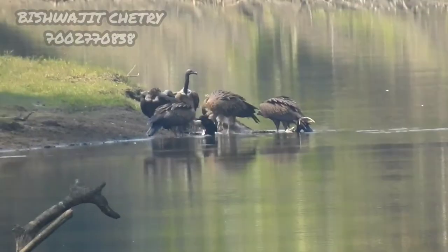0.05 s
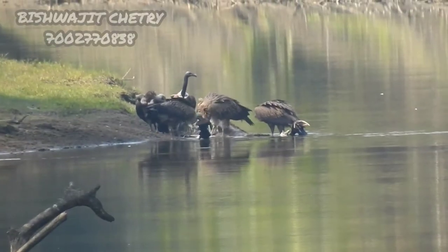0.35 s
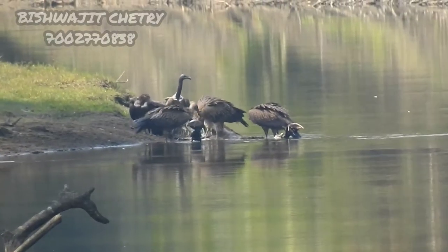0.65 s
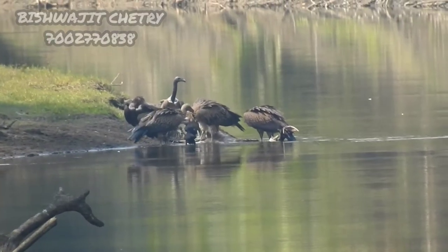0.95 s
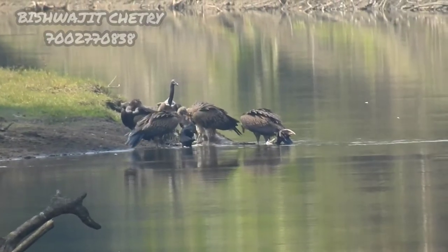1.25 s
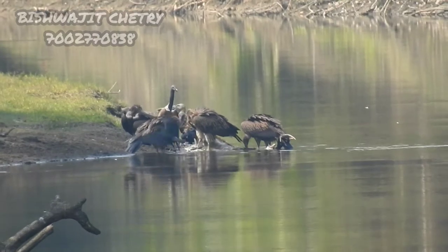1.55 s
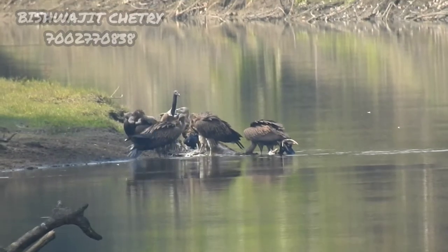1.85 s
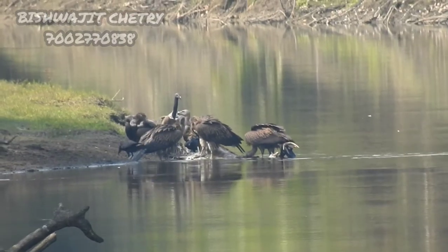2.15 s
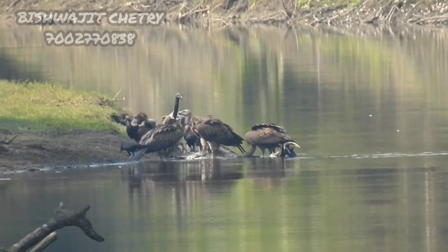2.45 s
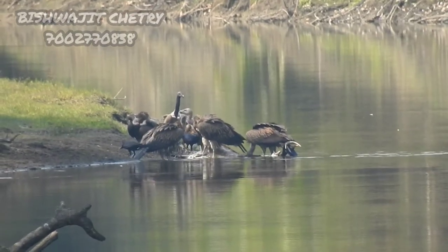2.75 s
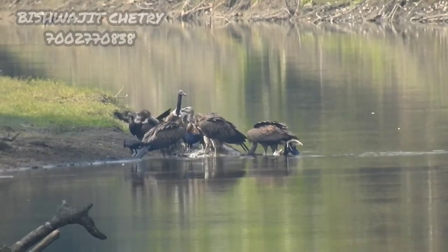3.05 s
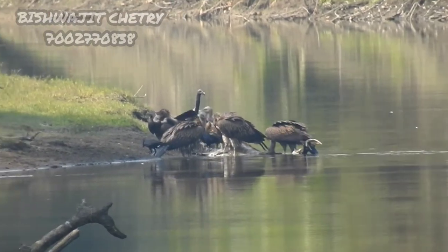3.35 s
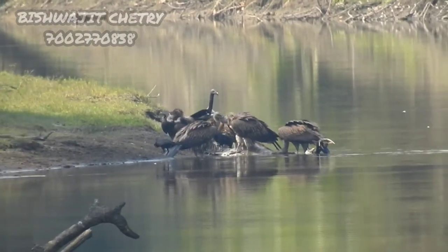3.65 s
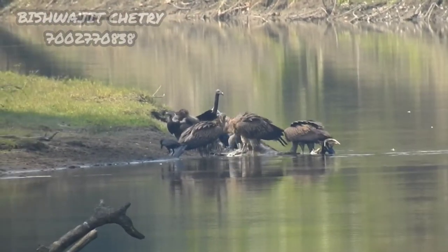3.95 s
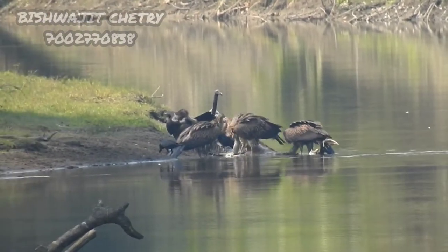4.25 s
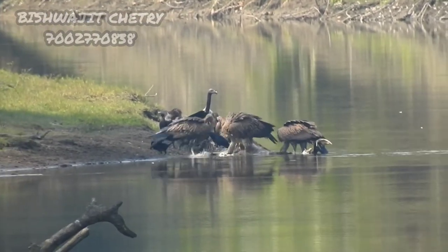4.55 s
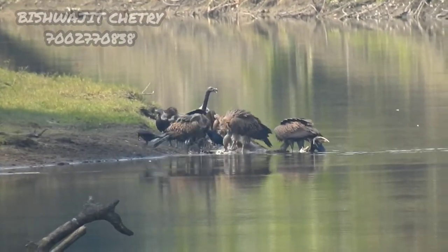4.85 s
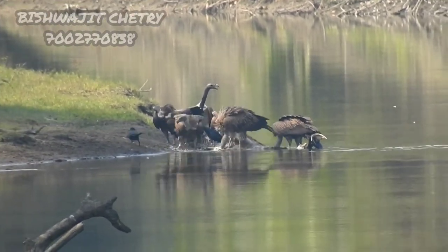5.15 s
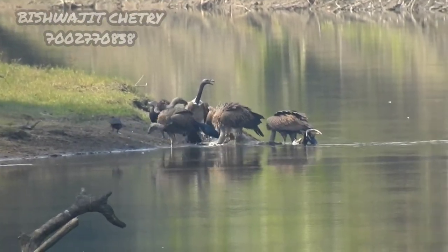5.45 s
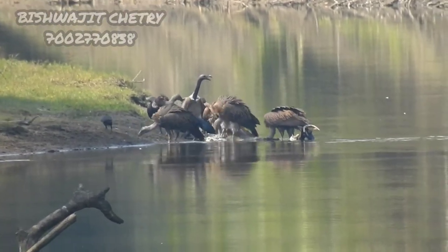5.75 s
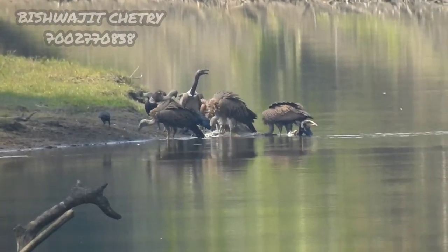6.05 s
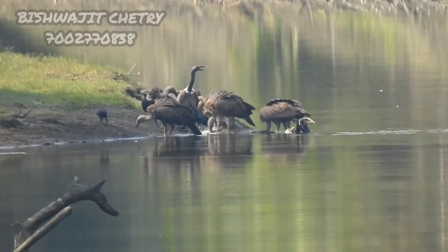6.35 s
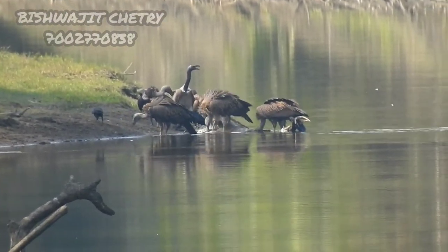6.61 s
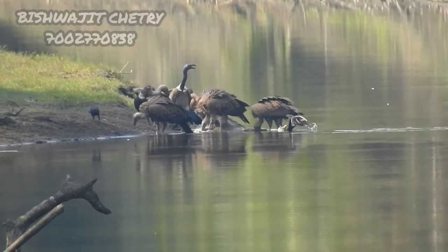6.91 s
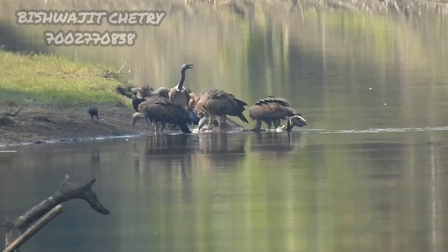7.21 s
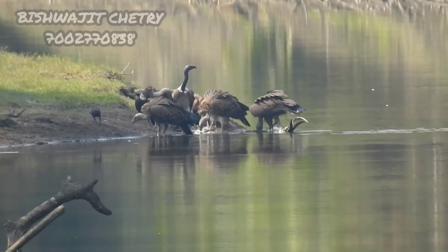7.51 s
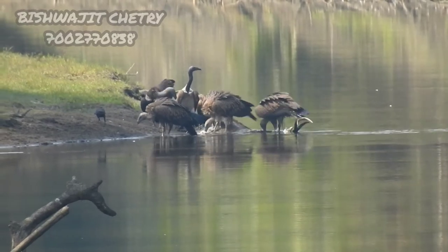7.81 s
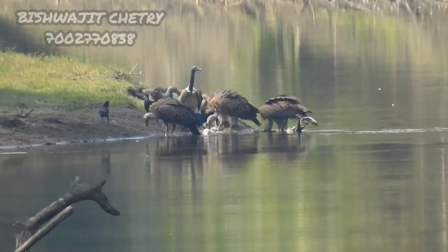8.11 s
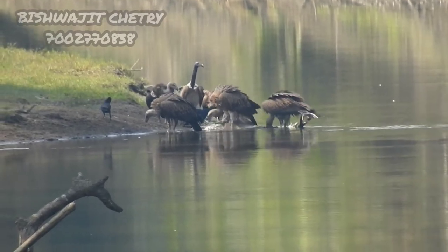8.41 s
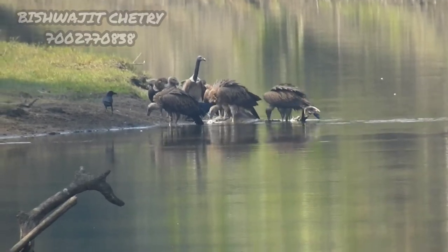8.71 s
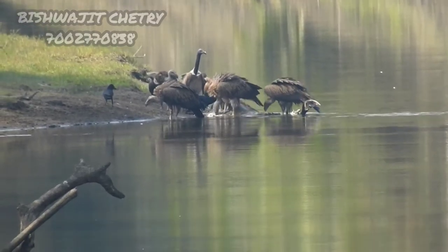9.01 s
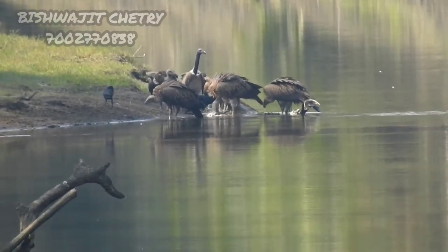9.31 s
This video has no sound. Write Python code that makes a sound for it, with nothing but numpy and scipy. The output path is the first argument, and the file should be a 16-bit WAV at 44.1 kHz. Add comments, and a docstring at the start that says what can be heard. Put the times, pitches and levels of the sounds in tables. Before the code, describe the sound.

Many small birds call over each other on a wooded river bank, with thin buzzy calls, mellow warbles and quick chips, each blurred by a short echo. Faint hoots and hoarse caws come from far off. About halfway, one sharp tick snaps close to the stereo microphones, followed by a few rising whistles and later a quick twitter. Distant chatter, thin hiss and a low drone lie behind throughout.

```python
"""A wooded river bank, heard through a stereo pair of microphones. Small birds call over each other,
each note a gliding, wavering tone from the syrinx: thin high calls, mellow warbles, twitters, chips,
rising whistles and far hoots and caws. The trees scatter every note into a short wash.
One sharp tick sounds close by, one dull knock further off. Behind it all lie a far chorus,
a thin hiss, a low steady drone and a fading rumble."""
import sys
import numpy as np
from scipy import signal
from scipy.fft import rfft, irfft, next_fast_len
from scipy.io import wavfile
from scipy.ndimage import uniform_filter1d

SR = 44100
rng = np.random.default_rng(int(sys.argv[2]) if len(sys.argv) > 2 else 0)


def materialize(psi):
    """Save the field psi as 16-bit PCM at rate SR to the path in sys.argv[1].

    A 1-D psi becomes a single channel; in a 2-D psi each row is a channel.
    """
    bounded = np.clip(np.atleast_2d(psi).T, -1, 1)
    quanta = np.round(bounded * 32767).astype(np.int16)
    wavfile.write(sys.argv[1], SR, quanta)


N = 422037
TIME = np.arange(N) / SR
SIDES = np.array([[.5], [-.5]])  # left and right microphone

# three-part calls: upstroke_start_s, upstroke_length_s, fall_lead_s, fall_db, upstroke_db, top_db
THIN_CALLS = [(0.745, 0.075, 0.068, -32.5, -31, -30), (3.596, 0.047, 0.069, -40.5, -37, -39.5),
              (4.979, 0.03, 0.099, -37, -31, -30.5), (7.964, 0.042, .092, -33.5, -32.5, -33.5),
              (9.055, 0.022, 0.081, -38, -29.5, -30)]
# lone high notes: start_s, length_s, pitch_hz, level_db, syllable
THIN_NOTES = [(1.72, 0.024, 6620, -34, "fall"), (2.385, 0.062, 6230, -42, "arch"),
              (2.803, 0.024, 6200, -36, "dive"), (3.26, 0.026, 7550, -45, "sag"),
              (5.565, 0.031, 7460, -45, "flat"), (8.795, 0.022, 7300, -42, "flat")]
def thin_calls(fall_hz=(6800, 5600, 5000), rise_hz=(5300, 6250, 8200), top_hz=(6300, 6680, 7000)):
    """High, buzzy calls: a soft fall, a pause, then an upstroke that runs into a top note."""
    notes = spell(THIN_NOTES)
    for start, length, lead, fall_db, rise_db, top_db in THIN_CALLS:
        notes += [(start - lead, 0.04, *fall_hz, fall_db),
                  (start, length, *rise_hz, rise_db),
                  (start + 0.62 * length, 0.046, *top_hz, top_db)]
    voice = sing(notes, waver=0.0176, buzz=0.039, edge=0.32, rough_db=-1.5)
    return place(voice, pan_db=-0.5, lag_ms=0.045, direct_db=-9.5, wet_db=-1.5, t60_s=0.65)


# mellow notes: start_s, length_s, pitch_hz, level_db, syllable
WARBLES = [(.205, 0.034, 2450, -40.5, "rise"), (.431, 0.025, 3535, -31.5, "sag"),
           (.455, 0.018, 3205, -29, "flat"), (.53, 0.056, 2336, -42, "sag"),
           (.635, 0.067, 2810, -37.5, "sag"), (.70, 0.031, 2210, -40.5, "sag"),
           (1.64, 0.06, 3376, -41.5, "arch"), (2.125, 0.063, 3300, -47, "arch"),
           (2.197, 0.041, 2850, -48, "fall"), (4.96, 0.034, 3380, -36, "flat"),
           (7.94, 0.043, 3700, -37.5, "sag"), (8.44, 0.031, 3610, -40, "sag"),
           (8.8, 0.045, 2760, -45, "lift"), (9.41, 0.17, 2918, -44.5, "flat")]
def warbles():
    """Mellow single notes, with a wash that builds slowly among the trunks."""
    voice = sing(spell(WARBLES), waver=0.014, edge=0.14, rough_db=3.5)
    return place(voice, pan_db=-2, lag_ms=-0.028, direct_db=-4, wet_db=-4.5, t60_s=1, build_s=0.02)


# a rising series: start_s, length_s, pitch_hz, glide_hz
WHISTLES = [(5.585, 0.015, 3590, 100), (5.7, 0.07, 3720, -30), (5.851, 0.055, 3864, 382),
            (5.986, 0.05, 4265, 190), (6.024, 0.036, 4412, 50)]
# echoes from the banks: delay_s, level_db
BANK_ECHOES = [(.024, -8), (0.048, -9), (.074, -13)]
def whistles(top_db=-27, db_per_octave=52):
    """Pure, straight glides, each higher and so louder than the last, thrown back by the banks."""
    top_hz = max(hz for _, _, hz, _ in WHISTLES)
    notes = []
    for start, length, hz, glide in WHISTLES:
        db = top_db + db_per_octave * np.log2(hz / top_hz)
        notes.append((start, length, hz - glide / 2, hz, hz + glide / 2, db))
    voice = sing(notes, edge=0.35)
    echoed = voice.copy()
    for delay, db in BANK_ECHOES:
        add(echoed, delay, undb(db) * voice)
    return place(echoed, lag_ms=.025, direct_db=0, wet_db=-7.5, t60_s=0.97, spread=0.83)


# four slurs: delay_s, length_s, pitch_hz, level_db, syllable
SONG = [(0, .043, 3400, -37.5, "fall"), (0.193, .038, 2810, -39.5, "fall"), (0.254, .05, 2400, -44, "sag"),
        (.342, 0.061, 2495, -43, "fall")]
# each time it is sung: start_s, gain_db
SONG_ENTRIES = [(4.898, 0), (9.02, -0.5)]
def songs():
    """A short warbled song that steps downward, from right of the microphones."""
    rows = [(start + delay, length, hz, db + gain_db, syllable)
            for start, gain_db in SONG_ENTRIES for delay, length, hz, db, syllable in SONG]
    voice = sing(spell(rows), waver=0.018, edge=0.21, rough_db=1)
    return place(voice, pan_db=-3.5, direct_db=-3.5, wet_db=-1, t60_s=0.92, build_s=0.026)


# three quick notes: start_s, length_s, pitch_hz, syllable
TWITTER = [(8.634, 0.047, 5560, "rise"), (8.678, 0.025, 4880, "hook"), (8.716, .03, 5730, "rise")]
def twitter(db=-35):
    """A loud up-down-up twitter from a perch to the right."""
    rows = [(start, length, hz, db, syllable) for start, length, hz, syllable in TWITTER]
    voice = sing(spell(rows), waver=0.014, edge=0.2, rough_db=2)
    return place(voice, pan_db=-4.5, lag_ms=0.046, wet_db=0.5, t60_s=0.68)


# short chips: start_s, length_s, level_db
CHIPS = [(1.668, .0067, -41), (7.872, 0.01, -45), (8.507, 0.0098, -35.5), (8.519, 0.0066, -33.5),
         (8.636, 0.017, -40.5)]
def chips(sweep_hz=(5500, 6800, 7660)):
    """Each chip is the same very fast upward sweep."""
    notes = [(start, length, *sweep_hz, db) for start, length, db in CHIPS]
    return place(sing(notes, waver=0.043), lag_ms=0.041, wet_db=-1.5, t60_s=0.71)


def tick(start_s=5.04534, hz=7000, upper_hz=9800, rise_ms=0.41, db=-9, echo_ms=0.93):
    """One thin snap near the microphones: a few cycles of two resonances and a quick reflection."""
    t = TIME[:SR // 100]
    age = 1000 * t / rise_ms
    envelope = (age * np.exp(1 - age)) ** 4
    ring = envelope * (np.sin(2 * np.pi * hz * t) + undb(-19) * np.sin(2 * np.pi * upper_hz * t))
    track = np.zeros(N)
    add(track, start_s, undb(db) * ring)
    add(track, start_s + echo_ms / 1000, undb(db - 13) * ring)
    return place(track, lag_ms=.012, direct_db=1.5, wet_db=-10, t60_s=0.085)


# slurred notes: start_s, length_s, pitch_hz, level_db, syllable
SLURS = [(0.418, 0.13, 4610, -50.5, "arch"), (1.048, 0.045, 5200, -47, "lift"),
         (2.105, 0.081, 5390, -49, "bow"), (2.45, 0.071, 4700, -48.5, "arch"),
         (2.465, 0.11, 6650, -46.5, "sag"), (2.545, 0.058, 3870, -48, "hook"),
         (3.036, 0.0315, 4250, -43, "ease"), (3.865, 0.076, 2810, -49.5, "flat"),
         (4.641, 0.11, 2950, -50.5, "rise"), (5.368, 0.034, 5370, -52, "fall"),
         (5.874, 0.038, 5200, -41.5, "dip"), (6.3, 0.11, 4770, -53.5, "arch"),
         (6.445, 0.031, 3840, -44.5, "dive"), (6.591, 0.035, 3000, -48, "fall"),
         (6.805, 0.049, 5100, -49, "fall"), (9.53, 0.038, 4100, -48, "fall")]
def slurs():
    """Single gliding notes from further along the bank."""
    voice = sing(spell(SLURS), waver=0.018, edge=0.074)
    return place(voice, pan_db=-3, direct_db=0, wet_db=0.5, t60_s=1, build_s=0.003)


# raspy notes: start_s, length_s, pitch_hz, level_db, syllable
FAR_TWITTERS = [(0, 0.044, 5200, -44, "rise"), (.13, .05, 4300, -48, "fall"),
                (1.29, .04, 4390, -43.5, "fall"), (1.56, 0.031, 2133, -44.5, "hook"),
                (1.59, .075, 5430, -43, "rise"), (2.0, 0.045, 3560, -43.5, "arch"),
                (2.85, 0.049, 5280, -44.5, "sag"), (3.125, .05, 2380, -47.5, "fall"),
                (3.28, 0.041, 2205, -43.5, "sag"), (3.675, 0.048, 3680, -43, "hook"),
                (3.7, 0.045, 2510, -47, "fall"), (4.0, 0.054, 2570, -47.5, "fall"),
                (4.83, .033, 5300, -40, "sag"), (6.06, .16, 5740, -53.5, "lift"),
                (6.94, 0.034, 4650, -45, "dive"), (7.34, .09, 3230, -63, "fall"),
                (8.24, 0.2, 4520, -50.5, "lift"), (8.885, 0.021, 3900, -49, "dive"),
                (9.415, .055, 4450, -45.5, "sag")]
def far_twitters():
    """Birds deep in the trees, reaching the microphones almost only as wash."""
    voice = sing(spell(FAR_TWITTERS), waver=0.045, edge=0.16, rough_db=5)
    return place(voice, pan_db=-3.5, direct_db=-8, wet_db=1.5, t60_s=0.77, build_s=0.0029)


# low notes: start_s, length_s, pitch_hz, level_db, syllable
HOOTS = [(2.872, 0.094, 916, -49, "ease"), (2.985, 0.043, 892, -48, "flat"),
         (3.79, 0.05, 935, -51.5, "sag"), (3.87, 0.098, 880, -52.5, "flat"),
         (5.225, 0.074, 952, -50.5, "sag"), (5.3, 0.083, 887, -52, "flat"),
         (5.752, 0.054, 844, -52.5, "ease"), (6.975, 0.091, 1027, -52.5, "rise")]
def hoots():
    """Soft hoots from far across the water."""
    voice = sing(spell(HOOTS), waver=0.015, edge=0.099)
    return place(voice, direct_db=1, wet_db=-4, t60_s=0.93, spread=0.36, build_s=0.018)


# distant caws: start_s, length_s, pitch_hz, level_db
CAWS = [(0.534, 0.39, 1357, -54), (1.058, 0.22, 1343, -50), (5.946, 0.34, 1486, -53),
        (6.397, 0.43, 1315, -55), (8.551, 0.21, 1285, -51)]
def caws():
    """Held notes, made hoarse by a fast waver in pitch and level."""
    notes = [(start, length, hz, hz, hz, db) for start, length, hz, db in CAWS]
    return place(sing(notes, waver=0.06, waver_hz=280, rough_db=3), spread=0.16)


def knock(start_s=2.3, hz=700, decay_s=0.014, db=-46):
    """One faint, dull knock some way off: a band of noise that dies quickly."""
    band = signal.butter(2, [hz / 2, hz * 2], "band", fs=SR, output="sos")
    body = unit(signal.sosfilt(band, rng.standard_normal(SR // 10)))
    track = np.zeros(N)
    add(track, start_s, undb(db) * body * np.exp(-TIME[:len(body)] / decay_s))
    return place(track)


# swell of the chorus: time_s, level_db
CHORUS_LEVEL = [(0, -59.5), (1, -63), (3.4, -64.5), (4.8, -57), (5.6, -63), (7.6, -62.5), (9.57, -60)]
# its colour at the microphones: frequency_hz, gain_db
CHORUS_COLOUR = [(2200, -2.5), (2800, 2.5), (3950, -2), (4500, -2), (5200, -6.5), (6000, 3)]
def chorus(count=800, low_hz=2150, high_hz=5650, scatter_db=3, bend=0.0799, length_s=.045):
    """Many far birds: short raspy slurs, blurred by the trees into a faint chatter."""
    timing, height, stretch = rng.random((count, 3)).T
    first, last, loudness = rng.standard_normal((count, 3)).T
    hz = low_hz * (high_hz / low_hz) ** height
    starts = (np.arange(count) + timing) / count * N / SR
    db = np.interp(starts, *np.transpose(CHORUS_LEVEL)) + scatter_db * loudness
    notes = zip(starts, length_s * (.5 + stretch), hz * (1 + bend * first), hz, hz * (1 + bend * last), db)
    chatter = shape(sing(notes, waver=0.02425, rough_db=3), CHORUS_COLOUR)
    return place(chatter, pan_db=-3, direct_db=-2.5, wet_db=4.5, t60_s=0.26)


# still air between the calls: frequency_hz, density_db
AIR_SPECTRUM = [(180, -42), (300, -5.5), (590, -2.5), (1000, 0), (1730, 0.5), (2250, -3), (3280, -0.5),
                (4210, -0.5), (6250, -5), (7880, -19), (15500, -35)]
# a narrow dip and peak in it: frequency_hz, gain_db
AIR_COLOUR = [(3600, 0), (3950, -6), (4200, 0), (5400, -0.5), (6200, 3), (7000, 1)]
# midrange level of the hiss: time_s, gain_db
MIDRANGE_GAIN = [(0, -4), (.25, -7), (.6, -2), (1.55, -0.5), (1.88, -4.5), (2.15, -4), (2.97, -3.5),
                 (3.2, -2), (5.9, -1), (7.7, -3), (7.9, -4), (8.15, -0.5), (9.57, -2)]
def hiss(db=-45.5, pan_db=-1, midrange_hz=(450, 2900)):
    """Background hiss whose midrange level starts low and dips briefly a few times."""
    air = shape(diffuse(AIR_SPECTRUM), AIR_COLOUR) * undb(db + SIDES * pan_db)
    midrange = signal.sosfiltfilt(signal.butter(2, midrange_hz, "band", fs=SR, output="sos"), air)
    gain = undb(np.interp(TIME, *np.transpose(MIDRANGE_GAIN)) + 1.27 * walk(8.3, N))
    return air + midrange * (gain - 1)


# low drone: frequency_hz, density_db
DRONE_SPECTRUM = [(25, -17.5), (70, -20.5), (150, 0), (210, 0), (420, -16), (800, -40)]
def drone(db=-55, sway_db=0.9):
    """Low, far noise whose level sways slightly."""
    return diffuse(DRONE_SPECTRUM) * undb(db + sway_db * walk(9, N))


# course of the rumble: time_s, level_db
RUMBLE_LEVEL = [(0, -53.5), (.5, -59), (.9, -67), (2.4, -83), (2.55, -69), (2.8, -78)]
def rumble():
    """A soft rumble that dies away and briefly returns."""
    noise = diffuse([(25, -18), (90, 16), (300, -28)])
    return noise * undb(np.interp(TIME, *np.transpose(RUMBLE_LEVEL)))


# glides the birds share, relative to mid-note: syllable: first_semitones, last_semitones
SYLLABLES = {"fall": (1.68, -2.72), "sag": (1.23, -1.02), "hook": (2.23, -0.11), "dip": (1.69, 2.74),
             "arch": (-0.925, -0.49), "rise": (-1.76, 0.91), "bow": (-2.5, -1.87), "flat": (0.11, 0.083),
             "ease": (0.44, -0.45), "lift": (0, 0.78), "dive": (2.7, -4.5)}
def spell(rows):
    """Give each note its first, middle and last pitch from its syllable."""
    notes = []
    for start, length, hz, db, syllable in rows:
        first, last = hz * 2 ** (np.array(SYLLABLES[syllable]) / 12)
        notes.append((start, length, first, hz, last, db))
    return notes


def sing(notes, waver=0.0049, waver_hz=400, buzz=0, buzz_hz=110, edge=0.015, rough_db=0):
    """A syrinx: each note is a sine gliding through three pitches, with waver, fast trill and rasp."""
    track = np.zeros(N)
    for start, length, first, middle, last, db in notes:
        size = int(length * SR)
        u = np.linspace(0, 1, size)  # share of the note gone by
        glide = np.polyval(np.polyfit([0, .5, 1], [first, middle, last], 2), u)
        trill = buzz * np.sin(2 * np.pi * buzz_hz * length * u)
        hz = glide * (1 + waver * walk(waver_hz, size) + trill)
        swell = np.sin(np.pi / 2 * np.minimum(np.minimum(u, 1 - u) / edge, 1))
        rasp = undb(rough_db * walk(waver_hz, size))
        tone = np.sin(2 * np.pi * np.cumsum(hz) / SR) * rasp
        add(track, start, undb(db) * swell * unit(tone))
    return track


def place(x, pan_db=0, lag_ms=0, direct_db=-2, wet_db=-6, t60_s=0.36, spread=0.4, build_s=0.002):
    """The path to the microphones: direct sound, then a wash scattered by trunks."""
    t = TIME[:SR]
    wash = rng.standard_normal((3, SR)) * undb(-60 * t / t60_s) * (1 - np.exp(-t / build_s))
    wash *= 1 + np.exp(-t / 0.0078)  # the nearest twigs and trunks answer first and loudest
    wash *= undb(wet_db) / np.sqrt(np.sum(wash ** 2, axis=1, keepdims=True))
    ahead = np.sqrt(1 - spread ** 2) * wash[0]  # the part from the source's own direction
    ahead[SR // 2000] += undb(direct_db)
    lag = np.exp(2j * np.pi * np.fft.rfftfreq(SR, 1 / SR) * SIDES * lag_ms / 1000)
    response = irfft(rfft(ahead) * lag, SR) * undb(SIDES * pan_db) + spread * wash[1:]
    return signal.fftconvolve(x[None], response, axes=1)[:, :N]


# stereo width of the background: frequency_hz, side_minus_mid_db
WIDTH = [(120, -11.5), (350, -2), (900, -9), (4800, -5.5), (6200, 2.5), (8000, -1)]
def diffuse(spectrum):
    """Noise from all around; the two microphones differ more in the treble."""
    mid, side = unit(shape(rng.standard_normal((2, N)), spectrum))
    return mid + 2 * SIDES * shape(side, WIDTH)


def shape(x, points):
    """Filter by a spectrum of (frequency_hz, gain_db) points."""
    hz, db = np.transpose(points)
    size = next_fast_len(N)
    bins = np.maximum(np.fft.rfftfreq(size, 1 / SR), 1)
    gain = undb(np.interp(np.log(bins), np.log(hz), db))
    return irfft(rfft(x, size) * gain, size)[..., :N]


def walk(rate_hz, size):
    """Smooth random drift with a spread near 1."""
    hold = max(int(SR / rate_hz), 1)
    steps = np.repeat(rng.standard_normal(size // hold + 2), hold)
    return 1.51 * uniform_filter1d(uniform_filter1d(steps, hold), hold)[:size]


def add(track, start_s, sound):
    """Mix a sound into a track."""
    i = int(np.clip(start_s * SR, 0, N - 1))
    track[i:i + len(sound)] += sound[:N - i]


def undb(db):
    """Decibels to gain."""
    return 10 ** (np.asarray(db) / 20)


def unit(x):
    """Scale to rms 1."""
    return x / np.sqrt(np.mean(x ** 2))


def scene():
    """The river bank, each singer on its own perch."""
    birds = thin_calls() + warbles() + songs() + far_twitters() + slurs()
    birds += twitter() + chips() + whistles() + hoots() + caws()
    background = chorus() + hiss() + drone() + rumble()
    return birds + background + tick() + knock()


def record(dry):
    """The recorder cuts the treble steeply above 15.6 kHz."""
    return signal.sosfilt(signal.ellip(10, .1, 70, 15600, fs=SR, output="sos"), dry)


dry = scene()
out = record(dry)
materialize(out)
```